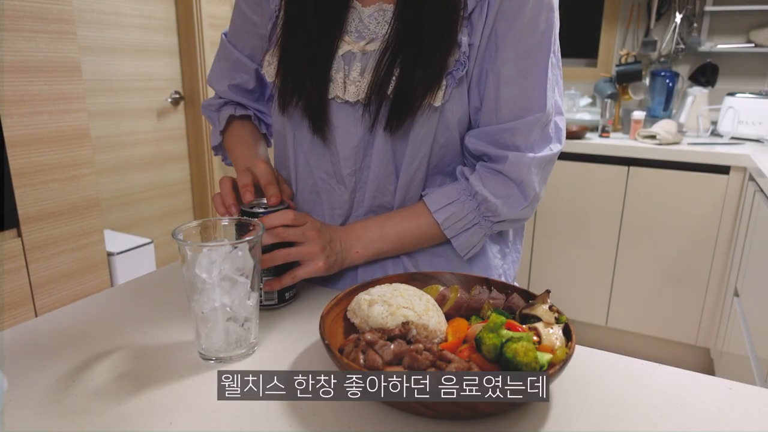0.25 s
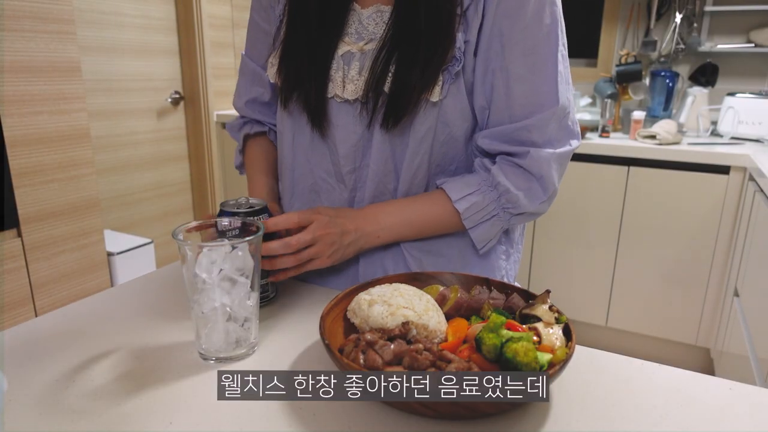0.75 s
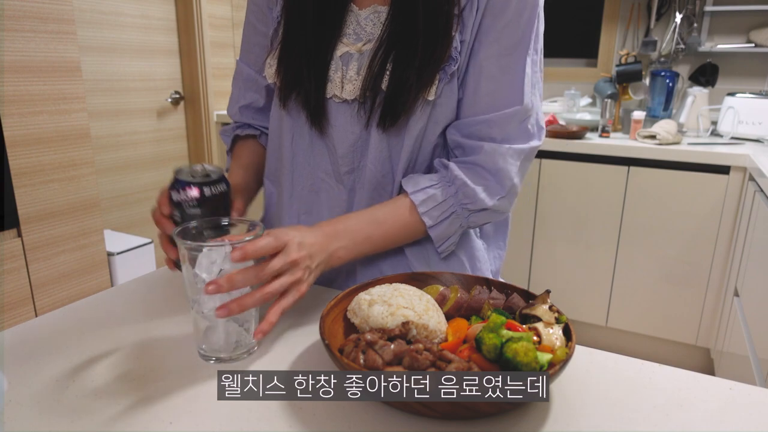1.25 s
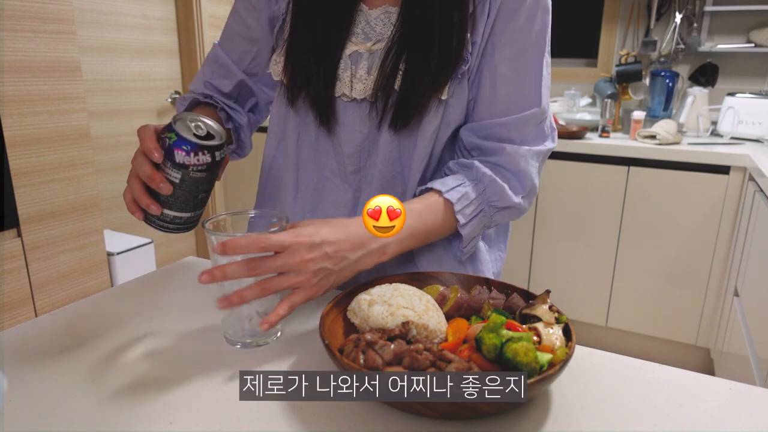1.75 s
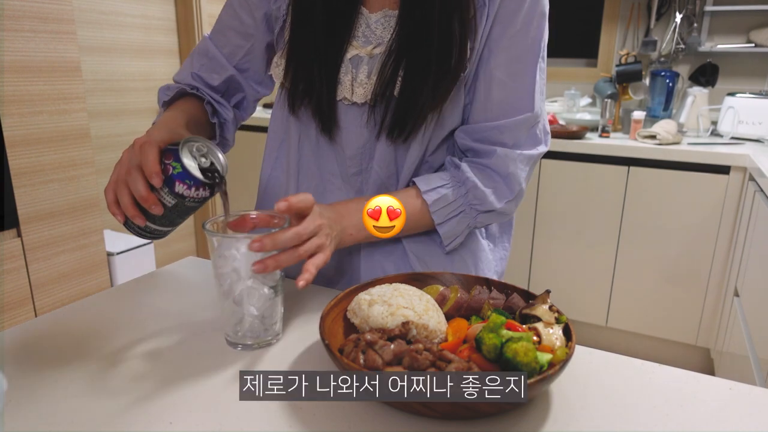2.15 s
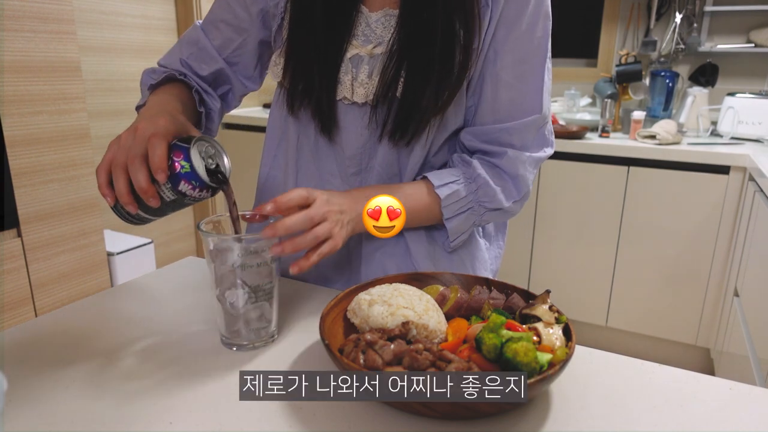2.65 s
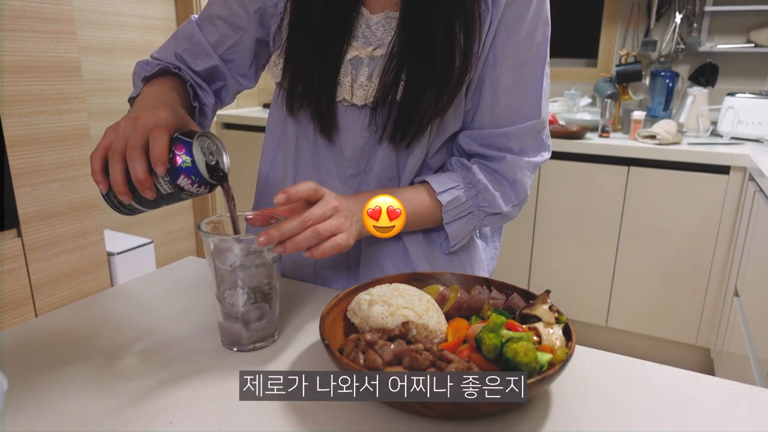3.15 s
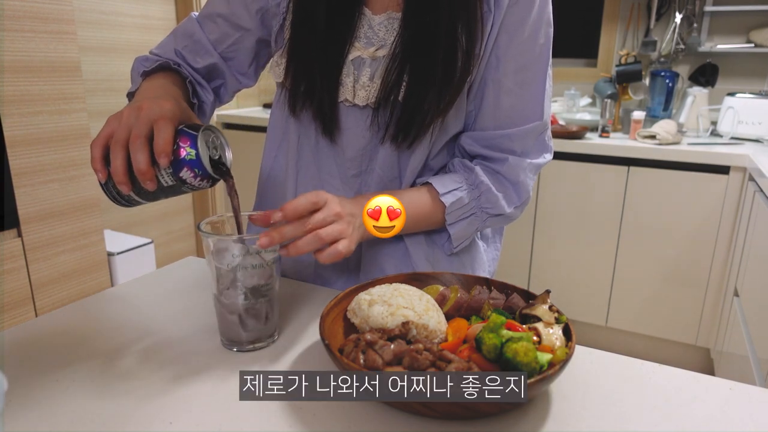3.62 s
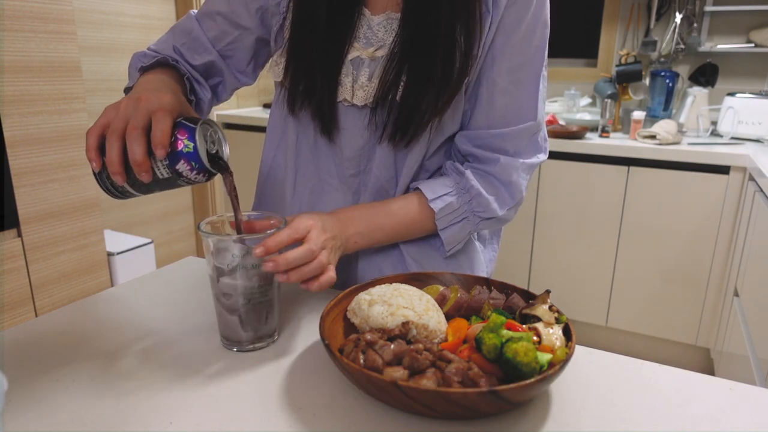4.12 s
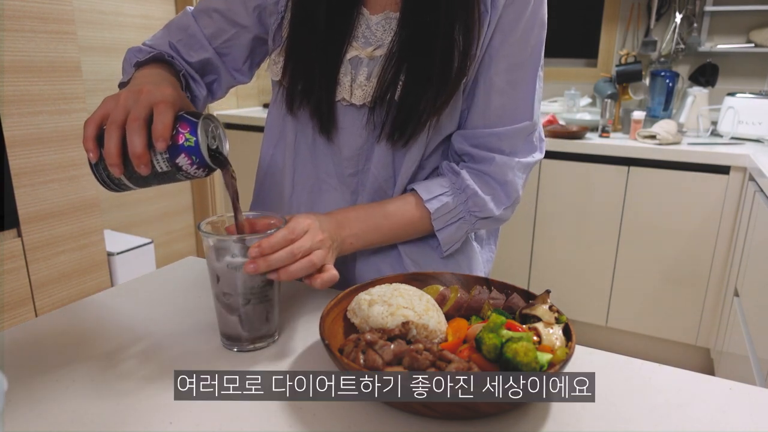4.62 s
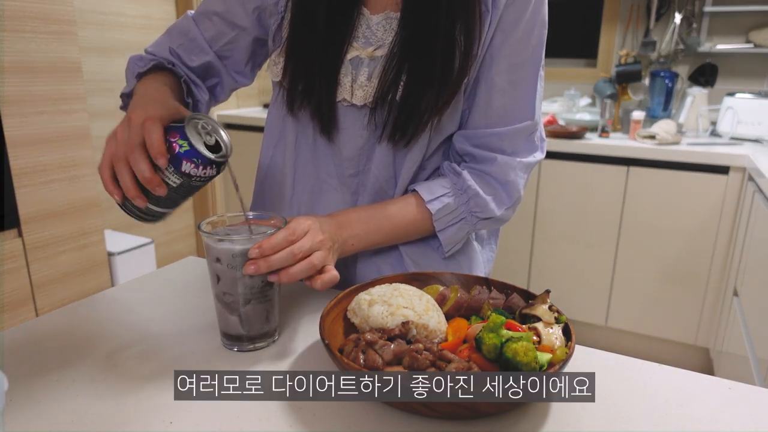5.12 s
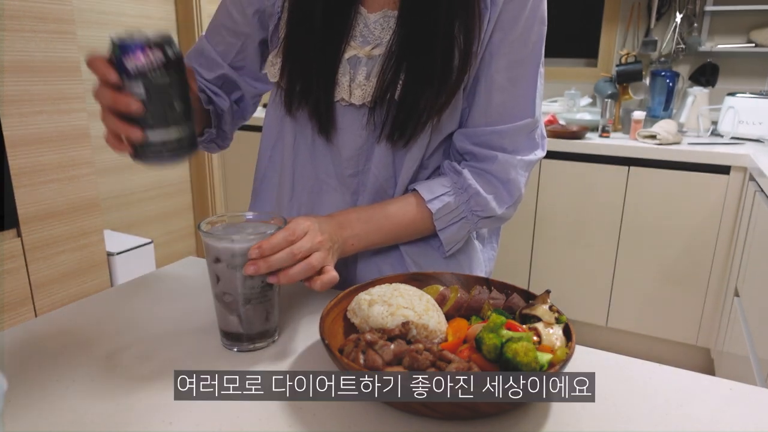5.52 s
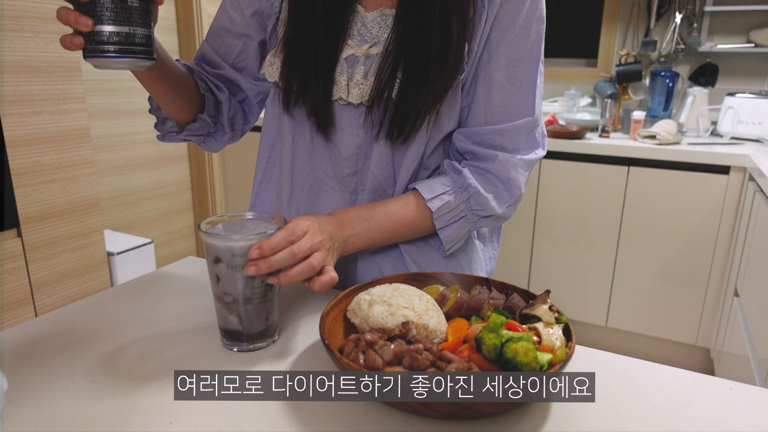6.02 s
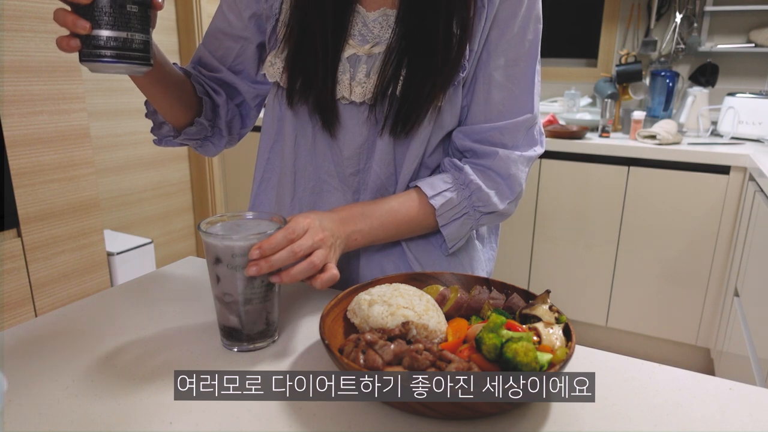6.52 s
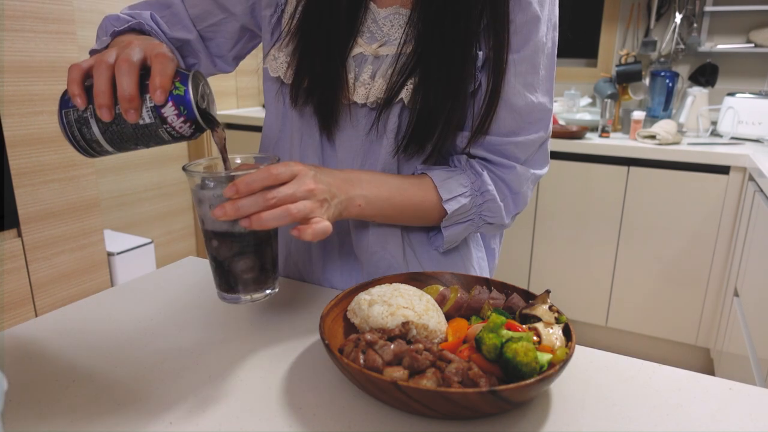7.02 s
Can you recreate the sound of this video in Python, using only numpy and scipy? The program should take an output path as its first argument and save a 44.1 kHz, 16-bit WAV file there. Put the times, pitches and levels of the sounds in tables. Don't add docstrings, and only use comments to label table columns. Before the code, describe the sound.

A quiet kitchen murmur runs throughout, heard close up with short bright reflections. At 0.26 s a can tab snaps; from 0.4 to 1.0 s the thin can scrapes, ticks and is set down with a dull thud. A glass rubs the table from about 1.5 s and knocks loudly at 1.7 s, again at 2.26 s. From 2.3 s soda trickles over ice, with tiny crackles and bubbling pops. Ice splits sharply at 2.8 s and hardest at 3.57 s, amid glassy clinks and dry snaps until 4.3 s. A short rattling gurgle comes around 4.1-4.35 s; the pour thins and ends near 5.2 s, with a small gulp at 4.85 s. Fizz rises steadily from 2.5 s. Light knocks sound at 5.24 s and, more strongly, 6.26 s. After 6.85 s the hiss continues duller to the end at about 7.4 s.

```python
import sys
import numpy as np
from scipy import signal
from scipy.fft import rfft, irfft
from scipy.io import wavfile
from scipy.ndimage import uniform_filter1d

SR = 44100
rng = np.random.default_rng(int(sys.argv[2]) if len(sys.argv) > 2 else 0)


def inscribe(sig):
    pcm = np.round(np.clip(np.atleast_2d(sig).T, -1, 1) * 32767)
    wavfile.write(sys.argv[1], SR, pcm.astype(np.int16))


def makeup_ratio(level_db):
    decades = np.asarray(level_db, float) / 20
    return 10 ** decades


N = 320607
RING_SENT_DB = -7
TABLE_ECHO_MS, TABLE_ECHO_DB = .425, -14.5
ICE_ECHO_MS, ICE_ECHO_DB = 0.83, -14


def unit(x):
    return x / np.sqrt(np.mean(x ** 2) + 1e-20)


def in_time(rows, silent_db=-120):
    s, level, *rest = np.transpose(rows)
    t = np.arange(N) / SR
    return [np.interp(t, s, level, silent_db, silent_db)] + [np.interp(t, s, c) for c in rest]


def at_hz(points, hz):
    table_hz, value = np.array(points).T[:2]
    return np.interp(np.log(hz + 1), np.log(table_hz), value)


def colour(x, spectrum):
    cepstrum = irfft(at_hz(spectrum, np.linspace(0, SR / 2, 2049)) * np.log(10) / 20)
    cepstrum[1:2048] *= 2
    cepstrum[2049:] = 0
    return signal.fftconvolve(x, irfft(np.exp(rfft(cepstrum))))[:len(x)]


def drift(rate):
    steps = rng.standard_normal(4000)
    return np.interp(np.arange(N) / SR * rate, np.arange(len(steps)), steps)


def swells(rows):
    t = np.arange(N) / SR
    peaks = [db - np.where(t < s, rise * (s - t), fall * (t - s)) for s, db, rise, fall in rows]
    return np.max(peaks, axis=0)


def grains(per_s, spread_db):
    sizes = makeup_ratio(spread_db * np.minimum(rng.exponential(1, N), 5)) * rng.choice([-1, 1], N)
    return sizes * (rng.random(N) < per_s / SR)


def ring(clicks, hz, t60):
    r = makeup_ratio(-60 / (t60 * SR))
    w = 2 * np.pi * min(hz, SR / 2.2) / SR
    return signal.lfilter([0, np.sin(w)], [1, -2 * r * np.cos(w), r * r], clicks + 1e-18)


def struck(hz, t60, size):
    t = np.arange(size) / SR
    swell = 1 - np.exp(-(t * hz / 1.2) ** 2)
    return np.sin(2 * np.pi * hz * t) * makeup_ratio(-60 * t / t60) * swell


def burst(ms, chance, size):
    x = 1. * (np.arange(size) == 0) + 1e-18
    lags = ms * SR / 1000 * ([.1, .25, .5] + chance * [.1, .15, .3])
    for lag in lags.astype(int) + 1:
        loop = np.r_[1, np.zeros(lag - 1), .6]
        x = signal.lfilter(loop[::-1], loop, x)
    return x


def echoed(x, ms, echo_db):
    lag = round(ms * SR / 1000)
    return x + makeup_ratio(echo_db) * np.r_[np.zeros(lag), x[:-lag]]


def add(out, sound, s, peak_db):
    i = round((s + 0.001146) * SR)
    out[i:i + len(sound)] += (sound * makeup_ratio(peak_db) / np.abs(sound).max())[:N - i]


def ticks(rows):
    out, wet = np.zeros((2, N))
    for s, peak_db, hz, t60, snap_db, snap_hz, reach in rows:
        reach = max(reach, 1.05)
        edges = [snap_hz / reach, min(snap_hz * reach, SR / 2.5)]
        band = signal.butter(3, edges, "band", fs=SR, output="sos")
        snap = signal.sosfilt(band, burst(.4, rng.random(3), size=SR // 16))
        snap = echoed(echoed(snap, TABLE_ECHO_MS, TABLE_ECHO_DB), ICE_ECHO_MS, ICE_ECHO_DB)
        snap = makeup_ratio(snap_db) * snap / np.abs(snap).max()
        tone = struck(hz, t60, size=SR // 16)
        tone = tone / np.abs(tone).max()
        add(out, tone + snap, s, peak_db)
        add(wet, makeup_ratio(RING_SENT_DB) * tone + snap, s, peak_db + RING_SENT_DB * (snap_db < 0) / 2)
    return np.array([out, wet])


def pitched_ticks(table, cycles, snap_ratio, reach):
    return ticks([(s, db, hz, cycles / hz, snap_db, hz * snap_ratio, reach)
                  for s, db, hz, snap_db in table])


def slide(shoves, modes, slips_per_s, spread_db):
    slips = grains(slips_per_s, spread_db) * makeup_ratio(2.2 * drift(39.27))
    body = 0
    for k, (hz, width, db) in enumerate(modes):
        body = body + (-1) ** k * makeup_ratio(db) * unit(ring(slips, hz, 2.23 / width))
    until_rest = np.arange(N) / SR < shoves[-1][0] + .2
    return makeup_ratio(swells(shoves)) * unit(body) * until_rest


def bubbles(clicks, dealt, pitches, cycles):
    out, run = np.zeros(N), slice(2 * SR, int(5.6 * SR))
    for k, hz in enumerate(pitches):
        mine = (clicks * (dealt == k))[run]
        out[run] += hz * ring(ring(mine, hz, cycles / hz), hz, cycles / hz)
    return out / np.std(out[run])


# (frequency [Hz], level [dB])
MURMUR = [(15, -20), (25, -39.5), (170, 0), (309, -0.5), (439, -1), (545, -2), (863, -6.5), (1100, -1.5),
          (1290, -9), (1560, -7.5), (2110, -5.5), (2280, -10), (3080, -14.5), (13600, -25), (16000, -27)]
# (frequency [Hz], side minus mid [dB])
MURMUR_SIDE = [(60, 5), (110, -5.5), (200, -3.5), (380, -6.5), (700, -1), (1290, -4), (2380, -6.5),
               (4400, -5.5), (8120, -8), (15000, -10)]
# (time [s], level [dB])
MURMUR_SWELL = [(0, 5.5), (.12, 1), (1.1, 2.5), (1.4, -0.5), (2.2, 3.5), (7.3, 0)]


def hum():
    mid, side = rng.standard_normal((2, N))
    mid = colour(mid, MURMUR)
    side = colour(colour(side, MURMUR), MURMUR_SIDE)
    level_db = -60.5 + in_time(MURMUR_SWELL)[0] + .5 * drift(2.87)
    return makeup_ratio(level_db) * (mid + side * [[1], [-1]]) / np.std(mid)


# (time [s], peak level [dB], pitch [Hz], snap over ring [dB])
CAN_KNOCKS = [
    (.001, -51, 1154, -20),
    (0.484, -40, 3080, -12),
    (0.511, -34, 3180, -2),
    (.512, -40, 5750, 0),
    (0.529, -38, 2820, -5),
    (.612, -42, 2790, -12),
    (0.646, -42, 1530, -9),
    (.647, -40.5, 2840, -5),
    (0.861, -35, 1500, -2.5),
    (0.866, -44, 2780, -8),
]


def can_ticks():
    return pitched_ticks(CAN_KNOCKS, cycles=110, snap_ratio=0.94, reach=1.4)


# (time [s], peak level [dB], crack length [ms], body ring [dB], share sent to the room [dB])
LOUD_BLOWS = [
    (0.2648, -23.5, .5, -15.5, -2),
    (1.696, -7, 1.13, -12.5, -0.5),
    (2.2573, -11, 1.0, -12.5, -4),
    (2.7816, -8.5, 1.6, -1, -4.5),
    (3.5717, -3.5, 1.1, -11, -7),
]
# (frequency [Hz], level [dB per Hz])
CONTACTS = [
    [(350, -38), (600, -46), (927, -29), (1140, -3.5), (1410, -17.5), (2750, -8), (3420, -19.5),
     (4680, -14.5), (15500, -31.5)],
    [(59, -21), (100, -25), (209, -11), (275, -19.5), (467, -11), (600, -25), (690, -7), (825, -13),
     (1150, -9), (1600, -8), (1850, -15), (2300, -12), (3200, -20), (4400, -28.5), (15500, -73)],
    [(40, -44), (100, -33), (162, -3.5), (429, -14.5), (590, -14), (700, 0), (825, -11.5), (1290, -5),
     (2630, -10), (3050, -16.5), (15500, -75)],
    [(59, -38), (100, -16.5), (627, -11.5), (1150, -20), (1480, -0.5), (2300, -13), (2900, -9.5),
     (3500, -12.5), (4300, -12.5), (5170, -15.5), (5630, -18.5), (8580, -22), (15500, -36)],
    [(59, -72), (100, -35), (200, -14.5), (313, -13.5), (668, -14.5), (1020, 1), (1300, -7), (1700, -2.5),
     (2130, -2), (2900, -10.5), (3600, -11), (4300, -15), (5400, -7), (6120, -2), (6660, -11.5),
     (8500, -16), (10800, -29), (12600, -26), (13500, -24), (15500, -36)],
]
# (frequency [Hz], level [dB], t60 [s])
STRUCK_BODIES = [
    [(1164, -6.5, 0.24), (4770, -3, 0.03), (2980, -10, .03), (6700, -18, .05)],
    [(678, -3.5, 0.29), (696, -15, 0.23), (1055, 6, 0.021), (1200, -24, 0.091), (1210, -9, 0.13),
     (1360, -25, 0.16), (1410, -22, 0.2), (1450, -8, 0.014), (2150, -13.5, 0.31), (2160, -19, 0.036),
     (2400, -10, 0.032), (3700, -7, 0.017), (736, -11, 0.13), (390, -17, 0.23)],
    [(165, -18, 0.33), (322, -26, 0.19), (646, -3, 0.28), (883, -10, 0.22), (1110, 0, 0.13),
     (1280, -1, 0.13), (1470, -8, 0.03), (1730, -13, 0.22), (2050, 2, 0.065), (2300, -11.5, 0.21),
     (2568, -4, 0.1), (3530, -3, .02), (4500, -2.5, 0.014)],
    [(1518, -14.5, 0.12), (1390, -19.5, 0.37), (1480, -25.5, 0.49), (1664, -9, 0.095), (650, -22, 0.066),
     (2740, -18, 0.065), (6300, -27, .05), (8500, -20, 0.05)],
    [(1014, 2.5, 0.059), (1150, -10, 0.12), (1669, -12, .08), (2078, 3, 0.038), (2287, -10.5, .12),
     (2650, -19, 0.069), (5000, -4, 0.011), (8500, -5, 0.027), (3680, 2, 0.02), (5944, -10.5, 0.15),
     (6350, -17, 0.21), (7600, -13, 0.046), (12560, -16.5, 0.098)],
]
# (delay [ms], level against the first [dB])
SECOND_LANDINGS = [
    (9, -28),
    (21.6, -14),
    (6.62, 4),
    (8.1, -37),
    (6.19, -9),
]


def blows():
    out, wet = np.zeros((2, N))
    for blow, contact, body, (ms, again_db) in zip(LOUD_BLOWS, CONTACTS, STRUCK_BODIES, SECOND_LANDINGS):
        s, peak_db, crack_ms, ring_db, wet_db = blow
        crack = colour(burst(crack_ms, rng.random(3), size=SR // 2), contact)
        crack = echoed(crack / np.abs(crack).max(), ms, again_db)
        modes = sum(makeup_ratio(db) * struck(hz, t60, size=SR // 2) for hz, db, t60 in body)
        add(out, crack + makeup_ratio(ring_db) * modes, s, peak_db)
        add(wet, crack + makeup_ratio(ring_db + RING_SENT_DB) * modes, s, peak_db + wet_db)
    pan_db = 1.3
    return out * makeup_ratio(pan_db * np.array([[.5], [-.5]])), wet


# (peak time [s], level [dB], swell [dB per s], fall [dB per s])
CAN_PUSHES = [
    (.4, -42, 400, 33),
    (.46, -40.5, 102, 150),
    (0.525, -35.5, 150, 148),
    (.617, -39.5, 392, 244),
    (0.652, -38.5, 600, 350),
    (0.79, -43.5, 105, 57),
    (0.866, -41, 800, 202),
    (1.0, -46.5, 30, 247),
]
# (frequency [Hz], width [Hz], level [dB])
CAN_MODES = [(400, 200, -8), (1530, 135, -0.5), (1900, 590, -6), (2300, 180, -5.5), (2760, 170, -2),
             (3330, 510, -5), (4700, 470, -13), (5650, 620, -8.5), (8500, 2900, -11)]


def can_slides():
    return slide(CAN_PUSHES, CAN_MODES, slips_per_s=3000, spread_db=1.4)


# (time [s], peak level [dB], pitch [Hz], snap over ring [dB])
SOFT_THUDS = [
    (0.873, -37.5, 220, 4),
    (0.934, -44, 166, 19),
    (4.843, -42, 597, -15),
    (4.846, -47, 450, -15),
    (4.95, -56, 480, -4),
    (6.255, -45.5, 400, 0),
    (6.258, -53.5, 172, -7),
    (5.24, -57, 170, -6),
]


def thuds():
    return pitched_ticks(SOFT_THUDS, cycles=8.9, snap_ratio=1.22, reach=1.6)


# (time [s], peak level [dB], pitch [Hz], snap over ring [dB])
GLASS_KNOCKS = [(1.29, -54, 1230, -22), (1.49, -55, 1030, -15), (1.614, -42, 678, -15),
                (1.641, -44, 961, -15), (1.655, -25.5, 1050, -22), (2.217, -34.5, 970, 0),
                (2.218, -38, 327, 5.5), (3.346, -40, 880, -17), (3.665, -57, 1025, -5),
                (5.239, -31.5, 1900, -3), (6.2555, -28, 1130, 8), (3.367, -40, 1050, -6)]


def glass_ticks():
    return pitched_ticks(GLASS_KNOCKS, cycles=8, snap_ratio=1.76, reach=1.41)


# (peak time [s], level [dB], swell [dB per s], fall [dB per s])
GLASS_PUSHES = [
    (1.36, -53, 100, 118.4),
    (1.5, -46, 300, 60),
    (1.535, -38.5, 158, 100),
    (1.575, -40, 100, 400),
    (1.64, -33.5, 500, 40),
    (1.662, -40, 280, 500),
    (1.69, -51, 1500, 3000),
]
# (frequency [Hz], width [Hz], level [dB])
GLASS_MODES = [(350, 310, 0), (666, 100, -0.5), (1050, 190, 0.5), (2000, 230, -7.5), (2450, 300, -11),
               (4300, 1500, -17)]


def glass_slides():
    return slide(GLASS_PUSHES, GLASS_MODES, slips_per_s=2500, spread_db=0.82)


# (time [s], peak level [dB], pitch [Hz],
# snap over ring [dB])
ICE_CLINKS = [(2.464, -39.5, 4470, -25), (2.425, -43, 4500, -10), (2.896, -41.5, 650, -22),
              (2.484, -33, 2130, -11), (2.571, -39, 2100, 0), (2.5712, -49, 4000, -2),
              (2.654, -28, 2450, -16), (2.658, -30, 2350, -14), (2.654, -26, 2150, -18),
              (2.654, -31, 3700, 3), (2.914, -38, 1580, 13), (3.093, -38.5, 4600, 0),
              (3.11, -38, 3360, -13), (3.194, -44, 4400, 9), (3.23, -35.5, 4200, -5),
              (3.272, -41, 4500, -2), (3.216, -38, 2000, -2), (3.366, -23, 4550, -6),
              (3.395, -32, 4350, -3), (3.464, -17, 4350, 11), (3.727, -32, 4200, -7),
              (3.8455, -32.5, 1700, -19), (3.8456, -28, 3930, 1), (3.943, -37, 1670, 0),
              (4.033, -37.5, 2160, 26), (4.096, -38.5, 1900, -1), (4.137, -35.5, 4400, 9),
              (4.18, -38, 4450, 4), (4.264, -33, 2300, -8), (4.265, -38, 1590, -2), (1.636, -41, 2500, -12),
              (1.655, -45, 2300, -12),
              (4.5142, -31.5, 2870, -4), (4.645, -41, 2100, 2), (4.7, -40.5, 1830, 5),
                (4.54, -39, 1730, -19), (4.948, -46.5, 1700, -13), (6.2575, -32.5, 2100, 7),
                (6.2555, -26.5, 3070, 6), (6.2558, -32, 1740, -2), (4.5146, -31, 4600, -3),
                (4.6, -38, 1830, -2), (5.238, -40, 4500, -4), (5.239, -46, 850, -2),
              (3.18, -43, 2670, -2), (3.266, -45, 1680, -6), (3.396, -47, 880, -7), (3.453, -39, 4350, -25),
              (3.562, -34, 11700, -30), (3.666, -37, 2020, -10), (3.708, -31, 4700, -6),
              (3.805, -39, 1600, -6), (4.137, -43, 1670, -16), (4.174, -37.5, 1900, 9),
              (4.204, -40, 1760, 0), (4.214, -40, 2400, -2), (4.257, -41, 1760, -5),
              (4.274, -36, 1600, -13), (4.296, -41, 2420, 3), (4.33, -44, 2560, 0), (4.342, -38, 2730, -2),
              (4.441, -43, 2700, -4), (5.213, -43, 1820, -1), (2.506, -38.5, 3000, -15),
              (2.916, -31, 4900, 0), (2.948, -37, 6300, 0), (4.034, -25.5, 12000, 15),
              (3.465, -29, 1900, 10), (3.878, -29, 5050, -19), (3.313, -49, 4400, -8),
              (2.2535, -27, 1000, 0), (.645, -43, 8500, 0), (2.398, -52, 14800, -20),
              (3.47, -31, 8200, -10)]


def ice_clinks():
    return pitched_ticks(ICE_CLINKS, cycles=20, snap_ratio=1, reach=1.4)


# (time [s], hiss level [dB])
HISS = [(2.1, -89), (2.46, -68), (2.87, -58.5), (3.3, -56), (3.88, -51), (4.89, -47.5), (5.31, -45.5),
        (6.84, -44), (7.3, -44.5)]
# (frequency [Hz], level [dB per Hz])
FOAM_COLOURS = [
    [(410, -26), (700, -5), (875, -36), (1200, -44), (1420, -97), (1640, -8), (1770, -8.5), (2240, -7.5),
     (2900, -5.5), (3400, -1), (3800, 2), (4320, 2), (5920, 2), (7390, 2), (9730, -2), (14600, -11.5),
     (16000, -8.5)],
    [(410, -54), (700, -25), (788, -23), (1120, -27), (1250, -36), (1350, -18), (1800, -7.5), (2160, -18),
     (2240, -16.5), (3260, -3), (3900, -8), (4800, -0.5), (5400, -5), (5990, 1.5), (7000, -7), (7700, -4.5),
     (8700, -5.5), (10500, -10.5), (14000, -18), (16000, -24)],
]
FOAM_RETURNS = [-14, -40]


def fizz():
    after = np.arange(N) / SR > 6.845
    level_db = in_time(HISS)[0] - 4 * after + .5 * drift(6.7) + 0.31 * drift(25)
    out = 0
    for foam, echo_db, on in zip(FOAM_COLOURS, FOAM_RETURNS, (~after, after)):
        mid, side = [unit(echoed(colour(grains(6500, spread_db=-0.5), foam), TABLE_ECHO_MS, echo_db))
                     for _ in range(2)]
        out = out + on * makeup_ratio(level_db) * (mid + makeup_ratio(-15.5) * side * [[1], [-1]])
    return out


# (time [s], trickle level [dB], air column pitch [Hz])
STREAM = [(2.3, -72, 1900), (2.5, -58, 2100), (2.75, -57, 1990), (3.2, -61, 1900), (3.43, -61, 1740),
          (3.47, -55.5, 1050), (3.55, -54, 1043), (3.8, -55.5, 1285), (4.0, -52.5, 1660),
          (4.16, -58.5, 1726), (4.35, -67, 2150), (4.45, -57.5, 2300), (5.2, -86, 2360)]


def trickle():
    level_db, column_hz = in_time(STREAM)
    drops = grains(1600 * makeup_ratio(2.0 * drift(25)), spread_db=3.5)
    scatter = 0.25 * np.clip(rng.standard_normal(N), -1.8, 1.8)
    step = np.round(6 * (np.log2(column_hz / 500) + scatter))
    return makeup_ratio(level_db) * bubbles(drops, step, 500 * 2 ** (np.arange(20) / 6), cycles=11.6)


# (time [s], peak level [dB], snap centre [Hz], ring [Hz], snap reach [pitch ratio])
ICE_SNAPS = [(2.4036, -52, 14500, 14600, 1.1), (2.422, -44, 8000, 6890, 1.18),
             (2.4825, -37, 11900, 12100, 1.15), (2.6269, -48, 8500, 9900, 1.2),
             (2.642, -37, 6500, 4600, 1.7), (2.6873, -38, 8500, 6600, 1.4), (2.7062, -42, 8000, 7000, 1.09),
             (2.817, -15, 13200, 4600, 1.24), (2.958, -29, 9600, 4700, 1.7),
             (2.962, -30, 10000, 10000, 2.3), (3.188, -36.5, 7500, 6300, 1.4),
             (3.2885, -35, 5940, 5500, 1.1), (3.3673, -22, 10400, 6200, 2.8), (3.458, -15, 11400, 7600, 2),
             (3.466, -21, 8200, 8300, 1.9), (3.547, -41, 10000, 6050, 1.1), (3.845, -28, 11000, 8200, 2.1),
             (3.8783, -23.5, 7750, 5100, 1.63), (3.945, -38, 9000, 7950, 1.2),
             (4.097, -35, 5800, 6500, 1.4), (4.034, -19.5, 6900, 6140, 1.95),
             (6.6894, -48, 7520, 6180, 1.4), (2.314, -54, 11500, 11000, 1.3),
             (2.334, -57, 11000, 11000, 1.15), (2.3706, -53, 11500, 6580, 1.15),
             (2.4455, -51, 6500, 6490, 1.25), (4.1326, -35, 13500, 7370, 1.2),
             (4.458, -41, 13500, 12500, 1.15), (4.474, -39, 11500, 11000, 1.15),
             (3.0965, -41, 8760, 7500, 1.15), (3.1479, -41, 7300, 7200, 1.28),
             (3.774, -43, 8500, 8600, 1.2), (3.822, -40, 8500, 8060, 1.2), (3.665, -47, 12300, 12500, 1.1),
             (3.113, -41, 8500, 7500, 1.2)]


def ice_snaps():
    return ticks([(s, db, hz, 0.012, 9, snap_hz, reach) for s, db, snap_hz, hz, reach in ICE_SNAPS])


# (peak time [s], level [dB], swell [dB per s], fall [dB per s])
POP_SWELLS = [
    (2.42, -66, 250, 10),
    (3.3, -57, 20, 8),
    (4.2, -62.5, 4.5, 16),
]
GLASS_PITCHES = [3770, 4200, 4350, 4400, 4450, 4770, 4600, 4700, 5600, 6200, 6270, 7600, 7750]


def pops():
    clicks = grains(260, spread_db=2.2)
    dealt = rng.integers(0, len(GLASS_PITCHES), N)
    return makeup_ratio(swells(POP_SWELLS)) * bubbles(clicks, dealt, GLASS_PITCHES, cycles=22.0)


# (peak time [s], level [dB], swell [dB per s], fall [dB per s])
GURGLES = [
    (4.135, -44, 510, 200),
    (4.176, -42, 900, 300),
    (4.208, -39.5, 300, 200),
    (4.265, -34.5, 600, 260),
    (4.296, -38, 500, 250),
    (4.335, -42, 400, 503),
]
# (frequency [Hz], width [Hz], level [dB])
AIR_POCKETS = [(1500, 230, -5), (1810, 250, 0), (2150, 350, -3), (2600, 380, -3)]


def gurgle():
    return makeup_ratio(-11.5) * slide(GURGLES, AIR_POCKETS, slips_per_s=1500, spread_db=2.4)


# (frequency [Hz], t60 [s])
ROOM_DECAY = [(100, 0.65), (300, 0.56), (1000, 0.47), (2500, 0.63), (5000, 0.44), (10000, 0.65),
              (16000, 0.15)]
# (time [s], level [dB])
EARLY_ECHOES = [(.0065, -9), (.0082, -14), (0.0125, -15), (0.014, -15), (0.019, -18), (.0233, -18)]
# (frequency [Hz], side minus mid [dB])
ROOM_WIDTH = [(100, -14.5), (1000, -12), (3000, -11.5), (12000, -7)]


def kitchen(x):
    t, tail = np.arange(SR) / SR, 0
    edges = 60 * 2 ** np.arange(0, 8.5, .5)
    white = rng.standard_normal((2, 2, SR))
    for k, (low, high) in enumerate(zip(edges, edges[1:])):
        band = signal.butter(2, [low, high], "band", fs=SR, output="sos")
        t60 = at_hz(ROOM_DECAY, np.sqrt(low * high))
        tail = tail + signal.sosfilt(band, white[k % 2]) * makeup_ratio(-60 * t / t60)
    tail = tail * np.clip((t - .003) / 0.00025, 0, 1)
    mid, side = tail / np.sqrt(np.sum(tail[0] ** 2))
    side = colour(side, ROOM_WIDTH)
    for s, db in EARLY_ECHOES:
        mid[round(s * SR)] += makeup_ratio(db)
    return np.array([signal.fftconvolve(x, mid + ear * side)[:N] for ear in (1, -1)])


def scene():
    loud, loud_sent = blows()
    small, small_sent = can_ticks() + thuds() + glass_ticks() + ice_clinks() + ice_snaps()
    rubs = makeup_ratio(-10.5) * (can_slides() + glass_slides())
    drink = trickle() + pops() + gurgle()
    walls = signal.butter(1, 7300, fs=SR)
    sent = loud_sent + makeup_ratio(-3.0) * signal.lfilter(*walls, small_sent)
    sent = sent + makeup_ratio(-4.5) * rubs + makeup_ratio(-11.0) * drink
    heard = loud + small + rubs + drink + kitchen(sent)
    thin = signal.butter(3, 130, "high", fs=SR, output="sos")
    return signal.sosfilt(thin, heard) + fizz() + hum()


def low_pass(x):
    return signal.sosfilt(signal.butter(12, 16830, fs=SR, output="sos"), x)


def record(dry):
    dry = signal.sosfilt(signal.butter(24, 16400, fs=SR, output="sos"), dry)
    spectrum = rfft(dry)
    hz = np.linspace(0, SR / 2, spectrum.shape[1])
    top = irfft(spectrum * (hz > 15750), N)
    opens_db = -56
    opens = uniform_filter1d(np.mean(top ** 2, axis=0), size=256) > makeup_ratio(2 * opens_db)
    mix = dry - top * (1 - uniform_filter1d(1. * opens, size=256))
    return low_pass(mix)


dry = scene()
out = record(dry)
inscribe(out)
```